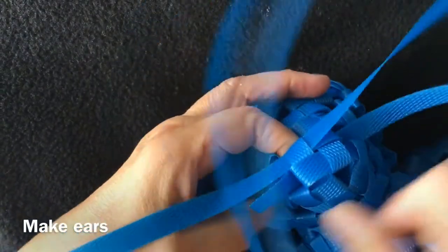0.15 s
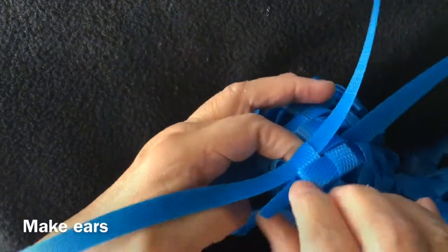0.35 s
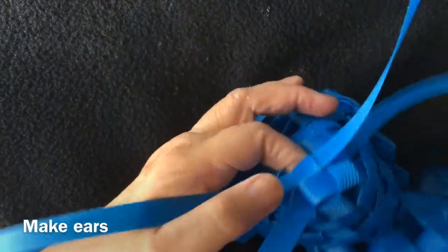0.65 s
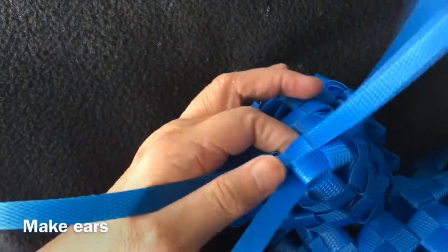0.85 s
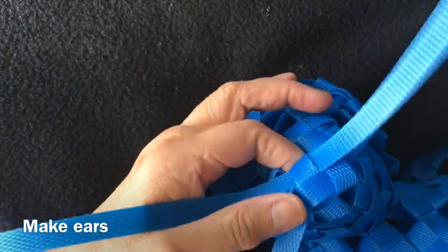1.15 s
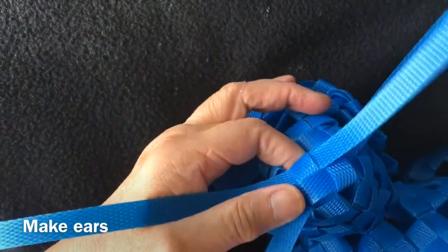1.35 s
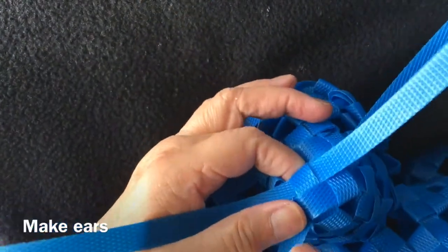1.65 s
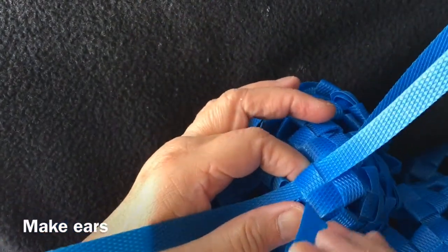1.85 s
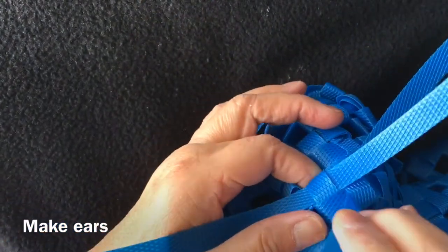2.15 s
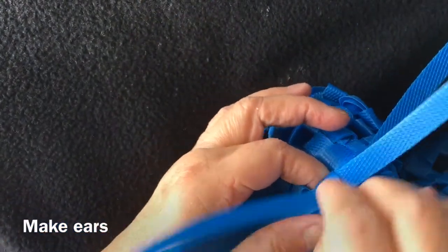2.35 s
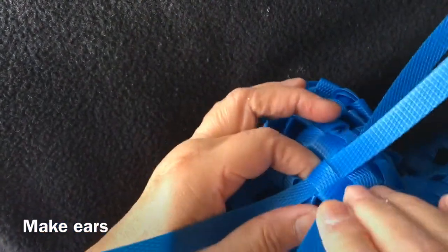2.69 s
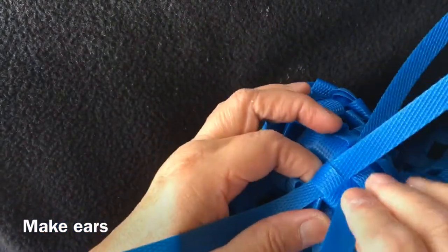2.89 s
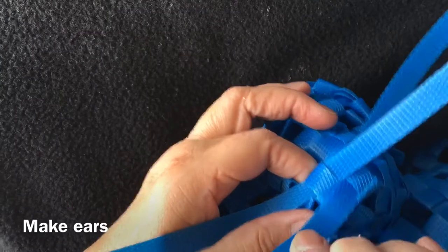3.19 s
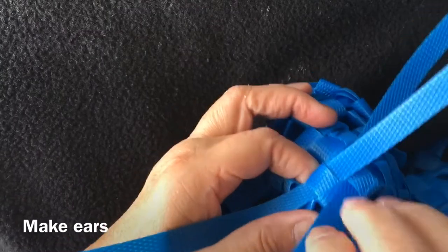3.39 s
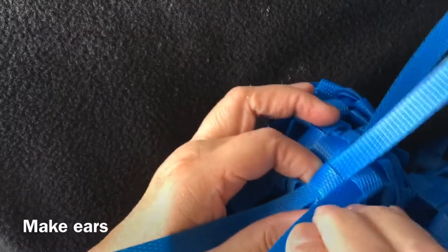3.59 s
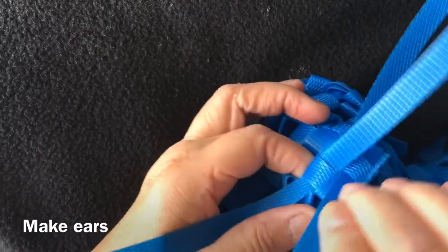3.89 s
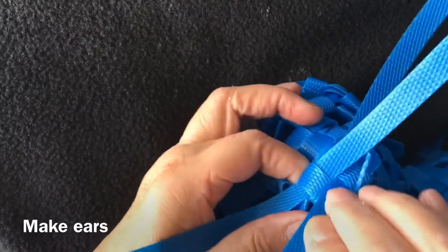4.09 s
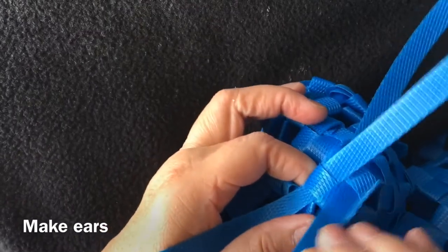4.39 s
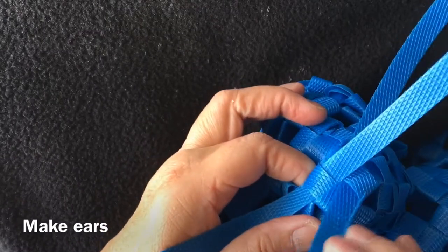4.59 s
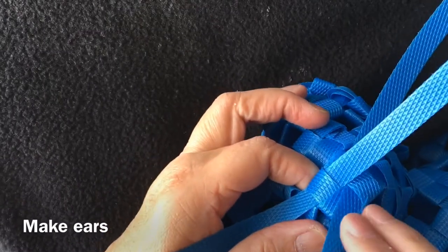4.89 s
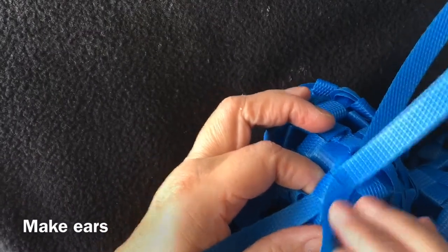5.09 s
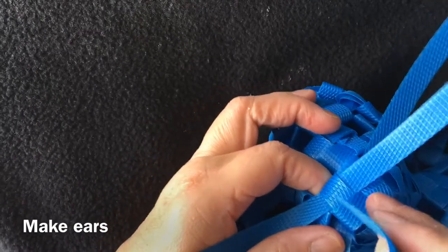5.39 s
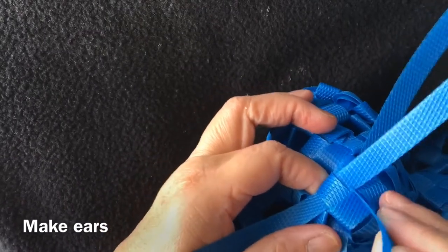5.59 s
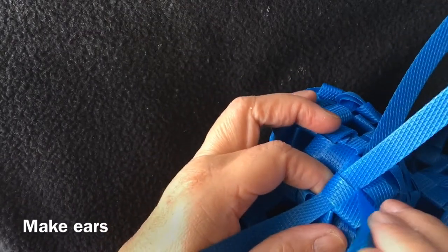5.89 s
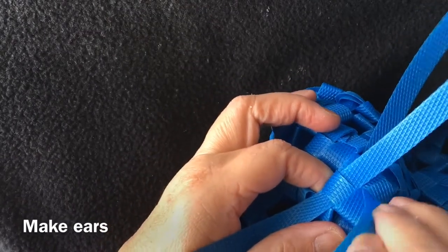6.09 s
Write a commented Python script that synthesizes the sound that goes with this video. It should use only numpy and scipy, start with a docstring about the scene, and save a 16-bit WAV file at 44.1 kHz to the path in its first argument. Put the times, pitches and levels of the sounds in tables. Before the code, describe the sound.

Hands weave stiff plastic strapping close to the microphone in a quiet, small room. After a light rub, a strap is pulled through the weave with a short, squeaky, rasping zip and sharp snaps. Faint rubs, scattered clicks and a few soft bumps of the woven piece follow as the end is tucked in. The loudest snap comes near the end.

```python
"""Hands weave stiff plastic strapping close to a microphone in a quiet room.
First a strap rubs lightly, its edge catching now and then. At about 0.7 s it is pulled through the
weave: its ribs scrape with a rasping zip and make the weave squeak, while strap edges slip and snap.
From about 1 s on, its end is poked under the next loop, with more rubs, sharp snaps and a few soft
bumps of the basket. The loudest snap comes just after 5 s."""
import sys
import numpy as np
from scipy import signal
from scipy.fft import rfft, irfft
from scipy.io import wavfile
from scipy.ndimage import uniform_filter1d

SR = 44100
rng = np.random.default_rng(int(sys.argv[2]) if len(sys.argv) > 2 else 0)


def file_out(sig):
    """Save sig as 16-bit WAV at sys.argv[1]."""
    # one column per channel
    cols = np.atleast_2d(sig).T
    # limit, then scale
    lim = np.clip(cols, -1, 1)
    pcm = np.round(lim * 32767).astype(np.int16)
    wavfile.write(sys.argv[1], SR, pcm)


N = 275625

# a strap slides lightly on a strap or a finger: start_s, end_s, level_db
RUB_STROKES = [(0.046, 0.292, -64), (0.295, 0.567, -70.5), (0.565, 0.601, -58.5), (0.634, 0.692, -54.5),
               (1.028, 1.095, -64.5), (1.221, 1.241, -58), (1.323, 1.409, -69), (1.644, 1.671, -55.5),
               (1.719, 1.813, -70.5), (2.009, 2.113, -71.5), (2.319, 2.394, -68), (2.479, 2.636, -74.5),
               (2.828, 2.915, -72), (2.939, 2.967, -63), (3.054, 3.107, -67.5), (3.143, 3.158, -62),
               (3.23, 3.416, -77), (3.425, 3.455, -57.5), (3.667, 3.734, -71), (3.776, 3.804, -61),
               (3.811, 3.952, -67.5), (4.425, 4.461, -64.5), (4.459, 4.51, -59), (4.678, 4.703, -65.5),
               (5.08, 5.098, -54), (5.137, 5.18, -57), (5.174, 5.25, -52.5), (5.29, 5.348, -57)]
# the pitches at which the tight strap and the weave ring: pitch_hz, width_hz, level_db
WEAVE_RESONANCES = [(250, 90, -11.5), (430, 250, -9.5), (613, 71, -5.5), (816, 130, -9), (1226, 320, 0.5),
                    (1620, 260, -1.5), (2040, 390, 1), (2520, 360, -6)]
# the hand takes up the strap, pulls hardest halfway and lets go
PULL_START_S, PULL_HARDEST_S, PULL_END_S = .664, .84, 1.025


def amp(db):
    """Turns decibels into a number to multiply by."""
    return 10 ** (np.asarray(db) / 20)


def unit(x):
    """Scales a signal to an average strength (rms) of 1."""
    return x / np.sqrt(np.mean(x ** 2) + 1e-20)


def read(points, hz):
    """Looks up a table of (pitch_hz, value), with the octaves evenly spaced."""
    pitch_hz, value = np.transpose(points)
    return np.interp(np.log(hz + 1), np.log(pitch_hz + 1), value)


def add(mix, start_s, sound):
    """Adds a sound into the mix at its start time."""
    part = mix[round(start_s * SR):][:len(sound)]
    part += sound[:len(part)]


def wander(length, size):
    """A smooth random curve that changes over about size steps."""
    return unit(uniform_filter1d(uniform_filter1d(rng.standard_normal(length), size), size))


def ripple(hz):
    """A strap's many narrow resonances, as random peaks and dips that flatten in the treble."""
    grid = np.linspace(0, SR / 2, 512)
    return np.interp(hz, grid, wander(len(grid), size=6) / np.sqrt(1 + (grid / 9000) ** 2))


def colour(x, spectrum, ripple_db=0):
    """Shapes a signal's lows and highs by a table, then scales it to strength 1."""
    hz = np.fft.rfftfreq(len(x), 1 / SR)
    return unit(irfft(rfft(x) * amp(read(spectrum, hz) + ripple_db * ripple(hz)), len(x)))


def sharpest_click(gain_db):
    """The most sudden click that has this spectrum (minimum phase)."""
    cepstrum = irfft(np.log(amp(gain_db)))
    half = len(cepstrum) // 2
    cepstrum[1:half] *= 2
    cepstrum[half + 1:] = 0
    return irfft(np.exp(rfft(cepstrum)))


def resonate(x, hz, width_hz):
    """Lets a signal ring around one pitch."""
    return signal.lfilter(*signal.iirpeak(hz, hz / width_hz, fs=SR), x)


def room_tone(level_db=-66.5):
    """The quiet room: a faint, steady, low noise."""
    # the room's background noise: pitch_hz, level_db
    spectrum = [(15, -64), (27, -33.5), (40, -7.5), (55, -6), (110, -3.5), (200, -7.5), (500, -19.5),
                (800, -23), (1650, -28), (4000, -33), (9300, -36), (13500, -38.5), (16000, -53)]
    return amp(level_db) * colour(rng.standard_normal(N), spectrum)


def friction(slips_per_s, spread_db, hiss, flutter_s=.00068):
    """Sliding plastic makes tiny uneven slips, each with a short flutter, over a smooth hiss."""
    size = amp(spread_db * np.minimum(rng.exponential(1, N), 4))
    slips = size * rng.choice([-1, 1], N) * (rng.random(N) < slips_per_s / SR)
    t = np.arange(256) / SR
    flutters = rng.standard_normal((8, len(t))) * np.exp(-t / flutter_s)
    choice = rng.integers(0, len(flutters), N)
    grains = sum(signal.oaconvolve(slips * (choice == k), f)[:N] for k, f in enumerate(flutters))
    return unit(grains) + hiss * rng.standard_normal(N)


def rubs(uneven_db=3.5, ripple_db=3.5):
    """Light strokes: grainy friction sounds the weave's body and hisses at the strap's edge."""
    # the rubbed weave's body: pitch_hz, level_db
    body_spectrum = [(60, -25.5), (200, 5), (700, -2), (1200, -1.5), (2300, -2), (3300, -11.5),
                     (6000, -29.5), (16000, -52)]
    # the hiss at the strap's edge: pitch_hz, level_db
    hiss_spectrum = [(100, -41.5), (1500, -24.5), (3200, -8.5), (4500, 0), (6800, 0.5), (9000, -3),
                     (13000, -2.5), (16000, -14)]
    grains = friction(slips_per_s=2200, spread_db=2, hiss=.73) * amp(uneven_db * wander(N, size=300))
    out, t = np.zeros(N), np.arange(SR // 2) / SR
    for start_s, end_s, level_db in RUB_STROKES:
        length_s = end_s - start_s
        fade_s = .012 + .096 * length_s  # long strokes swell and fade slowly
        touch_s = max(start_s - fade_s / 2, 0)
        part = grains[round(touch_s * SR):][:len(t)]
        swell = np.clip(np.minimum(t, length_s + fade_s - t) / fade_s, 0, 1)
        hiss_db = -1 + np.log2(length_s / .046)  # long strokes run faster and hiss more
        # each stroke touches other strips with their own resonances; a long slide blurs them
        peaks_db = ripple_db / (1 + (fade_s / .018) ** 2)
        body = colour(part, body_spectrum, peaks_db)
        hiss = amp(hiss_db) * colour(part, hiss_spectrum, peaks_db)
        add(out, touch_s, amp(level_db) * swell * (body + hiss))
    return out


def snap(level_db, rattle_share, pitch_hz, tilt_db_per_octave, rattle_s=.0024, ring_s=.007):
    """A freed edge strikes once; bending waves then rattle along the strap and die away."""
    # a narrow strap gives off little bass: pitch_hz, level_db
    strap_spectrum = [(20, -44), (100, -16), (250, -3.5), (420, -3.5), (720, -7.5), (1200, 1.5), (2000, -3),
                      (8000, -1.5), (13500, 0.5), (16500, -8)]
    t, hz = np.arange(2048) / SR, np.fft.rfftfreq(2048, 1 / SR)
    rattle = rng.standard_normal(len(t)) * (np.exp(-t / rattle_s) + .29 * np.exp(-t / ring_s))
    rattle_share = np.clip(rattle_share, .08, .95)
    blow = np.sqrt(rattle_share) * rattle / np.linalg.norm(rattle)
    blow[0] = np.sqrt(1 - rattle_share)  # the strike takes the rest of the energy
    # the free length of strap has one main resonance among many weak ones
    resonance_db = 7 / (1 + ((hz / pitch_hz - 1) / .09) ** 2) + 4 * ripple(hz)
    octaves = np.log2(np.clip(hz, 500, 12500) / 7370)
    brightness_db = tilt_db_per_octave * octaves - 9 * np.maximum(octaves, 0)  # the top treble droops
    click = sharpest_click(read(strap_spectrum, hz) + brightness_db + resonance_db)
    sound = signal.fftconvolve(blow, click)[:len(t)]
    sound = signal.lfilter([-.6, 1], [1, -.6], sound)  # high bending waves arrive first
    return amp(level_db) * sound / np.linalg.norm(sound) * np.sqrt(.005 * SR)  # level over 5 ms


def catches(per_s=30, boost_db=3.5, spread_db=2.5):
    """A sliding edge catches at random moments: tiny snaps, louder in a louder rub."""
    out = np.zeros(N)
    for (start_s, end_s, rub_db), chances in zip(RUB_STROKES, rng.random((len(RUB_STROKES), 40, 3))):
        length_s = end_s - start_s
        for when, size, place in chances[:round(per_s * length_s)]:
            level_db = rub_db + boost_db + spread_db * (2 * size - 1)
            tick = snap(level_db, rattle_share=.82, pitch_hz=1100 * 6 ** place, tilt_db_per_octave=-.5)
            add(out, start_s + when * length_s, tick)
    return out


def pull_stroke(rise_s=.02, fall_s=.053):
    """How the pull fades in and out (0 to 1), and how many ribs pass each second."""
    # how fast the strap's raised ribs pass the loop: time_s, rate_hz
    rib_rates = [(.66, 161.4), (.715, 220.6), (.78, 277.3), (.82, 250), (.87, 311.2), (.93, 307.7),
                 (.965, 260), (.99, 190.3), (1.03, 127.9)]
    t = np.arange(N) / SR
    held = np.clip(np.minimum((t - PULL_START_S) / rise_s, (PULL_END_S - t) / fall_s), 0, 1)
    return held, np.interp(t, *np.transpose(rib_rates))


def pull(rasp_db=-34.4, hiss_db=-37.9, shudder_db=-51.4, jitter=.035, chatter_db=.95):
    """Ribs scrape through the tight loop in quick puffs that hiss and make the weave ring."""
    # the hiss of the pulled strap: pitch_hz, level_db
    hiss_spectrum = [(40, -32), (200, -11.5), (700, -7), (1200, -1), (2800, 0), (3400, -5.5), (4300, 3.5),
                     (5200, -4.5), (6600, 3.5), (8500, -3.5), (12000, -3), (16000, -14)]
    # the basket shaken by the pull: pitch_hz, level_db
    shudder_spectrum = [(20, -30.5), (50, 0.5), (110, 1), (190, 5), (400, -17), (1500, -51), (16000, -91)]
    t = np.arange(N) / SR
    held, rib_hz = pull_stroke()
    force_db = np.interp(t, [PULL_START_S, PULL_HARDEST_S, PULL_END_S], [-7.5, 0, -7.5])
    ribs_passed = np.cumsum(rib_hz * (1 + jitter * wander(N, size=120))) / SR
    puffs = np.exp(-(ribs_passed % 1) / .35)
    grip = (.7 + puffs) * amp(chatter_db * wander(N, size=130))
    rasp = np.zeros(N)
    for hz, width_hz, level_db in WEAVE_RESONANCES:
        contact = amp(level_db + 3 * wander(N, size=900))  # each one's contact comes and goes
        rasp += contact * resonate(grip * rng.standard_normal(N), hz, width_hz)
    scrape = grip * friction(slips_per_s=7200, spread_db=1.5, hiss=.55)
    hiss = colour(scrape, hiss_spectrum, ripple_db=.6)
    tightness = np.interp(t, [PULL_START_S, PULL_END_S], [.2, 1.2])
    shudder = tightness * colour(rng.standard_normal(N), shudder_spectrum)
    return held * (amp(rasp_db + force_db) * unit(rasp) + amp(hiss_db) * hiss + amp(shudder_db) * shudder)


def squeaks(level_db=-39, tilt_db_per_octave=-4.5, lock_share=.3, jitter=.022, waver_db=3.5):
    """The weave sings briefly whenever a multiple of the rib rate meets one of its resonances."""
    held, rib_hz = pull_stroke()
    pulling = held > 0
    rib_hz, out = rib_hz[pulling], np.zeros(N)
    ribs_passed = np.cumsum(rib_hz * (1 + jitter * wander(N, size=120)[pulling])) / SR
    for multiple in range(1, 9):
        strength = 0
        for hz, width_hz, resonance_db in WEAVE_RESONANCES:
            off_pitch = (multiple * rib_hz - hz) / (lock_share * width_hz)
            strength += amp(resonance_db + tilt_db_per_octave * np.log2(hz / 1000)) / (1 + off_pitch ** 4)
        waver = amp(waver_db * wander(N, size=1500)[pulling])
        out[pulling] += strength * waver * np.sin(2 * np.pi * multiple * ribs_passed)
    return amp(level_db) * held * out


def snaps():
    """Strap edges slip off one another with sharp snaps."""
    # one slipping edge a row: start_s, level_db, rattle_share, pitch_hz, tilt_db_per_octave
    edge_slips = [(0.6731, -35, .8, 1190, -2), (0.6773, -31, .35, 1120, 2.5),
                  (0.6867, -22, 0.64, 2790, 1.8), (0.6896, -20.5, 0.96, 1040, 2),
                  (0.6959, -38, 0.8, 1020, -1), (0.8371, -24, .6, 1565, 5.5),
                  (0.8446, -27.5, 0.5, 2430, 1.5), (0.9488, -26.5, 1, 1820, 2), (0.985, -37, .4, 4300, 0),
                  (0.9952, -35, 0.3, 4500, 2), (1.0108, -36.5, 0.74, 2670, -1.8),
                  (1.016, -41, 0.4, 1140, -5), (1.086, -47, .6, 1360, -3), (1.1337, -30, .15, 6580, 2),
                  (1.1973, -49.5, 0.57, 2470, -1), (1.5482, -46, 0.5, 2010, -.5),
                  (1.601, -33, .75, 6170, 0.5), (1.658, -42.5, 0.7, 3350, -0.5),
                  (1.6619, -33.5, 0, 9300, 1), (1.6728, -43, 0.25, 3900, -0.5),
                  (2.0061, -55, 0.87, 1150, -.3), (2.0991, -50.5, 0.79, 1160, -1.5),
                  (2.3685, -48.5, 0.57, 2060, -2), (2.4896, -54, 0.27, 7300, 0.5),
                  (2.614, -41, 0.16, 3800, 4), (3.0723, -53.5, .4, 2720, 1.5),
                  (3.1614, -54, 0.4, 1970, 1.5), (3.4492, -46, 0.63, 1190, 0),
                  (3.8624, -48.5, 0.81, 996, -1.5), (3.9038, -41, 0.7, 6000, 0.3),
                  (3.9078, -39, 0.67, 1860, -0.5), (4.0134, -56, 0.3, 3730, -2),
                  (4.4854, -38, 0.32, 4620, 4.5), (4.6934, -44, 0.31, 1252, -2.7),
                  (4.9923, -57, .5, 6950, -1), (5.0512, -55.5, 0.76, 6980, 1), (5.0879, -34, 0.34, 4400, 3),
                  (5.1774, -18, 0.88, 7400, 3.5), (5.2076, -39.5, 0.5, 1740, -1.5),
                  (5.253, -45.5, 0.4, 2350, 0.5), (5.3044, -42.5, .35, 6130, 10),
                  (5.3267, -37.5, 0.5, 7000, 3), (5.6215, -47.5, 0.77, 1365, -.5),
                  (6.05, -42.5, .8, 6990, 4), (6.0576, -34, 0.56, 7100, 3)]
    out = np.zeros(N)
    for start_s, *settings in edge_slips:
        add(out, start_s, snap(*settings))
    return out


def bumps(rise_s=.00156):
    """A soft push sets the whole basket swinging for a moment."""
    # the hands bump the basket: start_s, level_db, pitch_hz, decay_s (time to fall by 60 dB)
    pushes = [(1.673, -55, 160, 0.14), (2.366, -47.5, 121, 0.1), (2.858, -39, 89.5, 0.049),
              (2.962, -52, 95, 0.093), (3.145, -49.5, 430, 0.037), (3.853, -48, 185, 0.15),
              (3.905, -47, 173, .14), (4.476, -48.5, 182, .12), (5.177, -27, 312, 0.019),
              (5.18, -45.5, 110, .14)]
    out, t = np.zeros(N), np.arange(SR // 4) / SR
    for start_s, level_db, pitch_hz, decay_s in pushes:
        swing = amp(level_db - 60 * t / decay_s) * (1 - np.exp(-t / rise_s))
        add(out, start_s, swing * np.sin(2 * np.pi * pitch_hz * t))
    return out


def room_echo(x, rise_s=.0073):
    """A small furnished room reflects the sound; each pitch dies away at its own speed."""
    # how long the echo takes to fall by 60 dB: pitch_hz, decay_s
    decay_times = [(200, .2), (1000, 0.23), (4000, 0.15), (9000, 0.19), (16000, .19)]
    hz, t, bands = signal.stft(rng.standard_normal(SR // 2), SR, nperseg=256)
    fade = amp(-60 * t / read(decay_times, hz)[:, None])
    tail = signal.istft(bands * fade, SR, nperseg=256)[1]
    tail *= np.minimum(np.arange(len(tail)) / SR / rise_s, 1)
    return signal.fftconvolve(x, tail / np.linalg.norm(tail))[:N]


def scene():
    """Mixes the room's background, the weaving and its echo into one channel."""
    background = room_tone()
    weaving = pull() + squeaks() + amp(-1) * rubs() + amp(-2) * snaps() + bumps() + catches()
    return (background + weaving + amp(-17.5) * room_echo(weaving))[None]


def record(dry, lowest_hz=40, highest_hz=16300):
    """The small microphone drops the deep bass, and the recorder cuts the highest treble."""
    thin = signal.sosfilt(signal.butter(4, lowest_hz, "highpass", fs=SR, output="sos"), dry)
    treble_cut = signal.firwin(301, highest_hz, window=("kaiser", 9), fs=SR)
    return signal.oaconvolve(thin, treble_cut[None], "same")


dry = scene()
out = record(dry)
file_out(out)
```